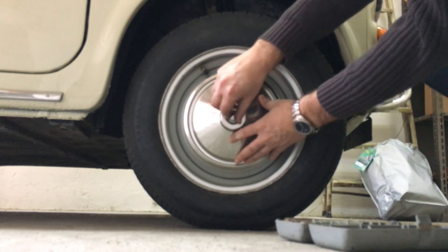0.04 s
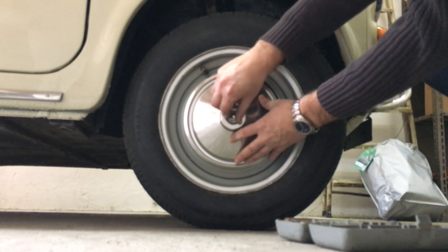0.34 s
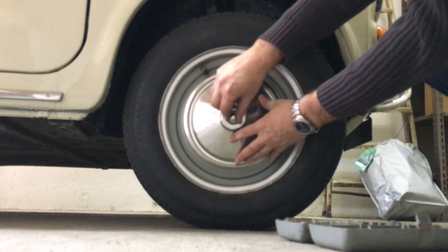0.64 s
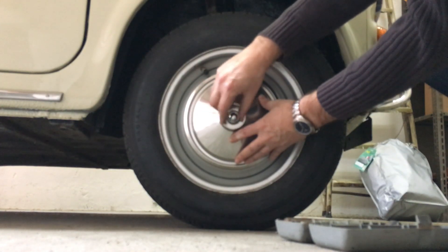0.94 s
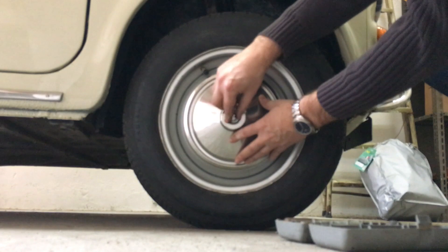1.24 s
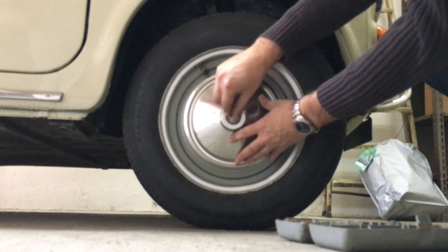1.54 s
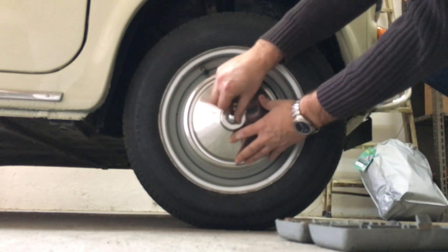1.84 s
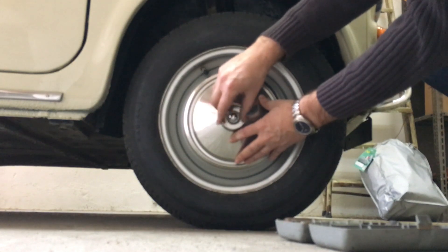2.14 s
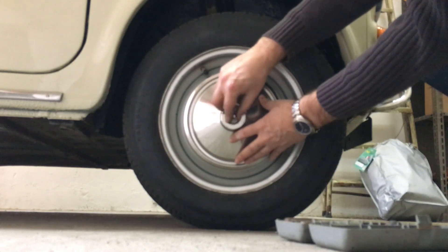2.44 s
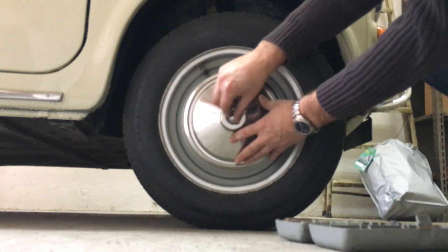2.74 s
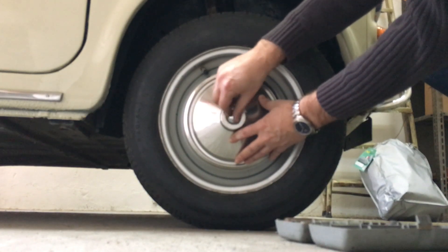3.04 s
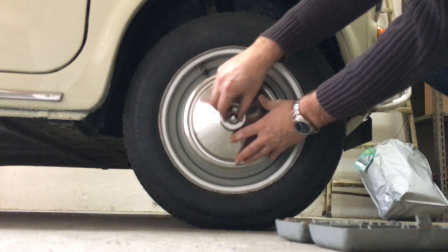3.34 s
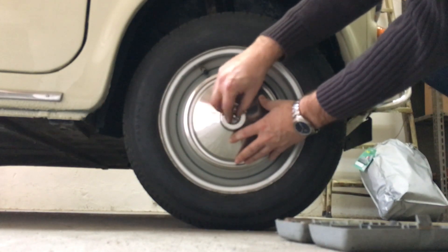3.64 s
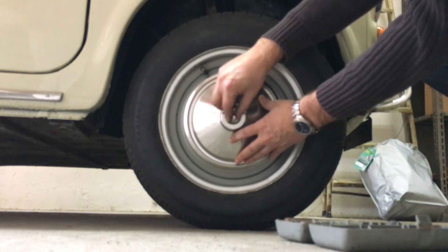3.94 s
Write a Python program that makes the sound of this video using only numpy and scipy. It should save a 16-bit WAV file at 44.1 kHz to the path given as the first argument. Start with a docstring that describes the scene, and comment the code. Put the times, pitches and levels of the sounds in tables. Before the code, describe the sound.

Close to the microphone in a garage, a hand-held metal hubcap clinks, rattles and scrapes while its bolt is turned. It occasionally rings briefly, and the hardest scrape comes near the end, with a faint outdoor rumble behind.

```python
"""A metal hubcap in a garage, close to one microphone, over a low outdoor rumble.
Fingers slide onto the cap and turn the bolt in its middle while the other hand holds it on the wheel.
From then on it knocks and scrapes on its seat: the hand chokes each ring at once, a faint ring stays on,
and the walls answer. Now and then the bolt pings or squeaks, or the grip eases and the cap sings.
Near 3 s a distant drone swells; the hardest scrape follows at 3.5 s."""
import sys
import numpy as np
from scipy import signal
from scipy.fft import rfft, irfft
from scipy.io import wavfile

SR = 44100
rng = np.random.default_rng(int(sys.argv[2]) if len(sys.argv) > 2 else 0)


def dump_mix(stems):
    """Bounce the given channels to the path in sys.argv[1] as a 16-bit WAV at rate SR."""
    frames = np.atleast_2d(stems).T  # one column per channel
    limited = np.clip(frames, -1, 1)  # hard clip at full scale
    pcm = np.round(limited * 32767).astype(np.int16)
    wavfile.write(sys.argv[1], SR, pcm)


N = 176400
CHOKE_S, CHOKE_HZ = .0045, 2570  # the hand damps a mode of this pitch with this time constant


def amp(db):
    """Decibels to amplitude."""
    return 10 ** (np.asarray(db) / 20)


def unit(x):
    """Scales to rms 1."""
    return x / np.sqrt(np.mean(x ** 2) + 1e-20)


def read(points, hz):
    """Reads a table on a log-frequency axis."""
    f, value = np.transpose(points)
    return np.interp(np.log(hz + 1), np.log(f + 1), value)


def add(mix, s, sound):
    """Mixes a sound in, starting at s seconds."""
    at = round(s * SR)
    sound = sound[max(-at, 0):]
    part = mix[max(at, 0):][:len(sound)]
    part += sound[:len(part)]


def noise(spectrum, size):
    """Noise of rms 1 with a given spectral shape."""
    gain = amp(read(spectrum, np.fft.rfftfreq(size, 1 / SR)))
    return unit(irfft(rfft(rng.standard_normal(size)) * gain, size))


def filt(x, hz, kind, order=3):
    """A Butterworth filter."""
    return signal.sosfilt(signal.butter(order, hz, kind, fs=SR, output="sos"), x)


def swell(t, rise, fall):
    """Pressure builds up to time zero and lets go."""
    return np.exp(-np.where(t < 0, -t / rise, t / fall) ** 1.38)


def cap(clatter_db, ring_on_db, pressed):
    """The cap's answer to one contact: choked modes, a faint free ring and a short clatter."""
    # Modes of the cap: (frequency [Hz], relative level [dB], share that rings on [dB], its t60 [s],
    # change when the rim is pressed [dB])
    cap_modes = [(737, -12, -22, .25, -1), (848, -9, -22, .3, 4), (868, 1, -16, .38, 1),
                 (1205, -9, -18, .3, -1), (1303, -12, -13, .3, 0), (1955, -17, -14, .35, 2),
                 (2160, -6, -26, .35, 2), (2265, 0, -27, .3, 0), (2420, -3, -30, .25, -2),
                 (2600, -2, -13, .37, -5), (3600, -15, -15, .4, 3), (3840, -4, -17, .3, -3),
                 (3888, -1, -16, .3, -1), (3998, -7, -23, .35, 1), (7628, -13, -15, .2, -9),
                 (10810, -31, -13, .2, -6)]
    # Dense modes of the sheet metal, as a spectrum: (frequency [Hz], relative level [dB])
    clatter_spectrum = [(200, -37), (480, -14), (820, 5.5), (1020, -31), (1300, 18.5), (1720, -54),
                        (2150, 0.5), (2680, 4.5), (2950, -3.5), (3900, -1), (4350, -4.5), (5200, -10),
                        (6800, -14.5), (7850, -14), (9200, -20.5), (10200, -35.5), (11900, -28.5),
                        (13500, -18), (16000, -37.5)]
    t = np.arange(SR // 2) / SR
    hz, db, share_db, t60, pressed_db = np.transpose(cap_modes)[:, :, None]
    choked = np.exp(-t / CHOKE_S * (hz / CHOKE_HZ) ** .51)  # the hand stops lower modes more slowly
    free = amp(share_db + ring_on_db - 60 * t / t60)
    strength = amp(db + pressed * pressed_db + 2 * rng.standard_normal(hz.shape))
    tones = np.sin(2 * np.pi * (hz * t + rng.random(hz.shape)))
    modes = (strength * (choked + free) * tones).sum(0)
    clatter = noise(clatter_spectrum, len(t)) * np.exp(-t / .004)
    attack = 1 - np.exp(-(t / .0009) ** 2)
    return (unit(modes) + amp(clatter_db) * unit(clatter)) * attack


def voiced(x, levels_db, window=slice(None)):
    """Sets the rms of four bands within a window: each contact excites them differently."""
    body = filt(x, 1700, "low", order=5)
    clang = filt(x, (1700, 3100), "band")
    ring = filt(x, (3100, 9800), "band")
    sizzle = filt(x, 9800, "high", order=6)
    bands = body, clang, ring, sizzle
    return sum(amp(db) * band / np.std(band[window]) for db, band in zip(levels_db, bands))


def knocks():
    """Single hard contacts of cap, bolt and wheel; the holding hand leaves only a faint ring."""
    # Contacts, with levels over the first 10 ms: (time [s], body [dB], clang [dB], ring [dB], sizzle [dB])
    contacts = [(.044, -52.5, -61, -76, -88), (.1381, -47, -48.5, -53.5, -69.5),
                (.1835, -45, -62, -72, -81), (.248, -49, -54, -74, -78), (.2608, -42.5, -51.5, -61, -70),
                (0.382, -57.5, -58, -61, -66), (0.662, -55, -49, -57, -71), (0.7508, -55, -57, -81, -85),
                (0.8026, -36.5, -35, -37.5, -45.5), (1.009, -54.5, -55, -73, -93),
                (1.0736, -51, -44.5, -67, -71), (1.154, -49.5, -45, -53, -76),
                (1.2523, -43.5, -35, -40, -70), (1.3765, -47, -45, -55, -69), (1.4726, -46, -46, -48, -73),
                (1.523, -54, -48, -53.5, -82), (1.6059, -57, -41.5, -40.5, -64),
                (1.728, -43.5, -37, -43, -87), (1.783, -41.5, -45, -46, -61),
                (1.8028, -37.5, -29.5, -36, -53), (1.816, -53, -37.5, -35.5, -54),
                (1.8327, -49, -40, -34, -70), (1.85, -50, -36.5, -40, -56.5),
                (1.9969, -46, -41.5, -55, -83), (2.0678, -68, -54, -30.5, -48.5),
                (2.17, -52, -56.5, -62, -78), (2.2548, -44.5, -43.5, -48, -75),
                (2.2804, -46.5, -40, -54, -69), (2.3276, -52, -40, -44, -64), (2.338, -56, -44, -39.5, -59),
                (2.4491, -45, -45, -48.5, -55), (2.516, -56, -54, -53, -85),
                (2.5285, -49.5, -40.5, -42.5, -69), (2.6699, -50.5, -56, -50.5, -72),
                (2.7292, -45.5, -42.5, -49.5, -74), (2.7619, -34.5, -36.5, -40.5, -56),
                (2.828, -50, -42, -43, -68), (2.956, -44.5, -32, -34.5, -80),
                (3.0205, -46, -43, -61, -50.5), (3.1, -43, -30.5, -33, -59), (3.109, -41, -52, -38, -70),
                (3.241, -54, -54, -63.5, -83), (3.4163, -38.5, -30.5, -36.5, -61),
                (3.423, -40, -56, -40, -60), (3.568, -43, -41, -45.5, -70), (3.6658, -55, -41.5, -62, -74),
                (3.671, -45, -54, -40, -66), (3.8285, -41.5, -39, -45, -90),
                (3.8929, -46.5, -51.5, -53.5, -74), (3.997, -53, -39.5, -54.5, -62)]
    out = np.zeros(N)
    for s, *levels in contacts:
        knock = cap(clatter_db=-12, ring_on_db=-8.5, pressed=False)
        add(out, s, voiced(knock, levels, window=slice(0, SR // 100)))
    return out


def slips(size, per_s, spread_db):
    """Random small slips of uneven strength, one impulse each."""
    slipping = rng.random(size) < per_s / SR
    strength = amp(spread_db * np.minimum(rng.exponential(1, size), 3))
    return slipping * strength * rng.choice([-1, 1], size)


def scrapes():
    """Bursts of stick and slip at three points of the rim; pressed metal rings on less."""
    # Scrapes of metal on metal, with relative levels:
    # (peak time [s], rise [s], fall [s], body [dB], clang [dB], ring [dB], sizzle [dB])
    bursts = [(0.155, 0.029, 0.063, -47, -59, -57, -84.0), (0.215, 0.01, 0.033, -38.5, -42.5, -48, -61),
              (0.248, 0.049, 0.02, -41, -64, -45.5, -66), (0.545, 0.0093, 0.012, -59, -40.5, -45, -64),
              (0.577, 0.024, 0.01, -35.5, -37.5, -38, -63.5), (0.797, 0.011, 0.0047, -64, -43, -46, -56),
              (0.825, 0.016, 0.014, -32, -50, -32.5, -58), (1.095, 0.031, 0.016, -38.5, -51.5, -50, -69),
              (1.308, 0.035, 0.023, -33, -45, -41, -61), (1.395, 0.0096, 0.05, -45, -49.5, -47.5, -77),
              (1.553, 0.011, 0.018, -37, -39.5, -39, -62), (1.808, 0.05, 0.039, -33.5, -39.5, -38.5, -58),
              (1.895, 0.07, 0.36, -53, -73, -55.5, -74), (1.975, .004, 0.0088, -40, -51, -52, -76),
              (2.045, 0.0067, 0.03, -41, -40, -37, -51.5), (2.075, 0.033, 0.012, -34, -33, -49, -53),
              (2.204, 0.0099, 0.026, -42.5, -53, -46.5, -67),
              (2.293, 0.018, 0.013, -35.5, -32.5, -34, -50.5), (2.352, 0.013, 0.03, -38.5, -57, -46, -66),
              (2.505, 0.03, 0.045, -44.5, -47, -54, -64), (2.541, 0.008, 0.0087, -43, -55, -49.5, -62),
              (2.767, 0.024, 0.036, -65, -45.5, -43, -57), (3.014, 0.03, 0.035, -41.5, -39, -41.5, -65),
              (3.482, 0.014, 0.02, -23, -35, -31, -51), (3.72, 0.015, 0.034, -32, -37.5, -40, -58.5)]
    band_trim_db = (-7.5, -4.5, -7, -4)
    out, t = np.zeros(N), np.arange(-SR // 4, SR // 4) / SR
    for s, rise, fall, *levels in bursts:
        pressure = swell(t, rise, fall)
        scrape = 0
        for _ in range(3):
            force = slips(len(t), per_s=300, spread_db=4) * pressure
            scrape += signal.fftconvolve(force, cap(clatter_db=-4, ring_on_db=-14, pressed=True))
        scrape = voiced(scrape, np.add(levels, band_trim_db), window=slice(0, len(t)))
        add(out, s + t[0] - CHOKE_S, scrape * np.sqrt(np.mean(pressure ** 2)))
    return out


def rings():
    """After some knocks the grip eases and the cap sings in three notes until the hand closes on it."""
    # Eased grips: (time [s], wait for the hand [s], relative level of low, middle, high note [dB])
    releases = [(1.154, .05, -48, -59, -66), (1.6061, .05, -53, -44, -59), (2.956, .043, -38, -47, -53),
                (3.1005, .2, -43, -39, -52)]
    # Singing modes, each a close pair that beats: (frequency [Hz], its twin [Hz], t60 [s])
    singing_modes = [(2602, 2580, .36), (3842, 3884, .18), (7628, 7652, .14)]
    twin_db, grip_s = -9, .008
    out, t = np.zeros(N), np.arange(SR // 3) / SR
    for s, wait, *levels in releases:
        envelope = (1 - np.exp(-t / CHOKE_S)) * np.exp(-np.maximum(t - wait, 0) / grip_s)
        for db, (hz, twin_hz, t60) in zip(levels, singing_modes):
            pair = np.sin(2 * np.pi * hz * t) + amp(twin_db) * np.sin(2 * np.pi * twin_hz * t)
            add(out, s, amp(db - 60 * t / t60) * envelope * pair)
    return out


def squeaks():
    """Brief, unsteady squeaks of steel on steel."""
    # Squeaks of the bolt: (peak time [s], pitch [Hz], level [dB], rise [s], fall [s])
    bolt_squeaks = [(.56, 1950, -48, .02, .015), (2.4503, 14720, -31, .001, .0028),
                    (3.0225, 14500, -47, .001, .004), (3.022, 2120, -29, .002, .004),
                    (3.012, 3290, -48, .006, .02), (3.017, 5300, -54, .01, .012)]
    width = .04  # share of the pitch
    out, t = np.zeros(N), np.arange(-SR // 10, SR // 10) / SR
    for s, hz, db, rise, fall in bolt_squeaks:
        waver = unit(filt(rng.standard_normal(len(t)), hz * width, "low", order=2))
        pitch = hz * (1 + width / 2 * waver)
        tone = unit(np.sin(2 * np.pi * np.cumsum(pitch) / SR))
        add(out, s + t[0], amp(db) * tone * swell(t, rise, fall))
    return out


def pings():
    """The loose bolt rings with one high note of its own."""
    # Small pings of the bolt: (time [s], level [dB])
    bolt_pings = [(.139, -51), (.382, -61), (3.308, -64)]
    hz, t60 = 4530, .13
    out, t = np.zeros(N), np.arange(SR // 4) / SR
    for s, db in bolt_pings:
        add(out, s, amp(db - 60 * t / t60) * np.sin(2 * np.pi * hz * t))
    return out


def rubs():
    """Soft, dull friction of the hand on the cap."""
    # Rubs of the hand: (peak time [s], level [dB])
    hand_rubs = [(.215, -52), (1.091, -52.5), (1.223, -54), (1.303, -52), (1.479, -51.5), (1.551, -55)]
    out, t = np.zeros(N), np.arange(-SR // 10, SR // 10) / SR
    for s, db in hand_rubs:
        friction = unit(filt(rng.standard_normal(len(t)), (314, 720), "band", order=2))
        add(out, s + t[0], amp(db) * friction * swell(t, rise=.015, fall=.014))
    return out


def slides():
    """Fine-grained friction of skin on the polished face."""
    # Finger strokes: (peak time [s], rise [s], fall [s], level [dB])
    strokes = [(0.019, 0.16, 0.083, -56), (0.861, 0.079, 0.066, -58)]
    # Their hiss: (frequency [Hz], relative level [dB])
    hiss_spectrum = [(300, -25), (1400, 10), (2000, -19), (3500, 0.5), (5000, -10.5), (16000, -48)]
    out, t = np.zeros(N), np.arange(-SR // 3, SR // 3) / SR
    for s, rise, fall, db in strokes:
        add(out, s + t[0], amp(db) * noise(hiss_spectrum, len(t)) * swell(t, rise, fall))
    return out


def garage(direct):
    """The microphone hears the direct sound, near echoes off the floor and car, then a diffuse tail."""
    # Decay of the room: (frequency [Hz], t60 [s])
    room_decay = [(200, 0.92), (900, 0.58), (4000, 0.48), (8000, 0.41), (15000, 0.087)]
    tail_db, echo_db, echo_span_s, build_up_s = -13, -13, .013, .019
    hz, t, spectra = signal.stft(rng.standard_normal(SR), SR, nperseg=256)
    envelope = amp(-60 * t / read(room_decay, hz)[:, None]) * np.minimum(t / build_up_s, 1)
    tail = signal.istft(spectra * envelope, SR, nperseg=256)[1]
    echoes = np.zeros(len(tail))
    echoes[(SR * echo_span_s * rng.uniform(.2, 1, size=8)).astype(int)] = rng.choice([-1, 1], size=8)
    answer = amp(tail_db) * tail / np.linalg.norm(tail) + amp(echo_db) * echoes / np.linalg.norm(echoes)
    return direct + signal.fftconvolve(direct, answer)[:N]


def outdoors():
    """A low rumble from outside and a distant, wavering drone that swells late."""
    # Outdoor rumble: (frequency [Hz], relative level [dB])
    rumble_spectrum = [(20, -43), (32, -8), (48, -5.5), (75, 0.5), (130, -5.5), (500, -14), (1000, -16.5),
                       (2000, -26.5), (4000, -31), (8000, -41), (15000, -46)]
    # Swell of the drone: (time [s], level [dB])
    drone_levels = [(0, -73.5), (2.3, -70.5), (2.65, -59), (2.9, -55), (3.15, -62), (4, -56)]
    drone_hz, width_hz = 55.5, 4.3
    band_hz = (drone_hz - width_hz / 2, drone_hz + width_hz / 2)
    drone = unit(filt(rng.standard_normal(N), band_hz, "band", order=2))
    drone_db = np.interp(np.arange(N) / SR, *np.transpose(drone_levels))
    return amp(-60) * noise(rumble_spectrum, N) + amp(drone_db) * drone


def scene():
    """The handled cap close up in its garage, the outdoors behind it, in mono."""
    hubcap = knocks() + rings() + scrapes() + squeaks() + pings() + rubs() + slides()
    return (garage(hubcap) + outdoors())[None]


def record(dry):
    """The recorder's bass cut at 36 Hz and band limit at 16 kHz."""
    band_limit = signal.firwin(255, 16000, window=("kaiser", 9), fs=SR)
    return signal.oaconvolve(filt(dry, 36, "high", order=5), band_limit[None], "same")


dry = scene()
out = record(dry)
dump_mix(out)
```